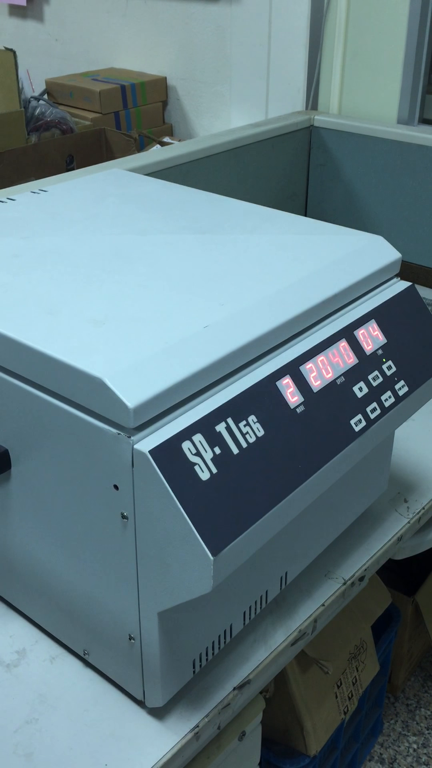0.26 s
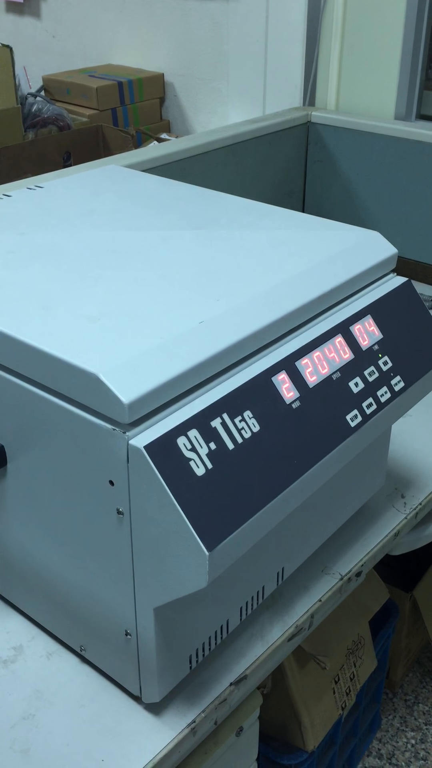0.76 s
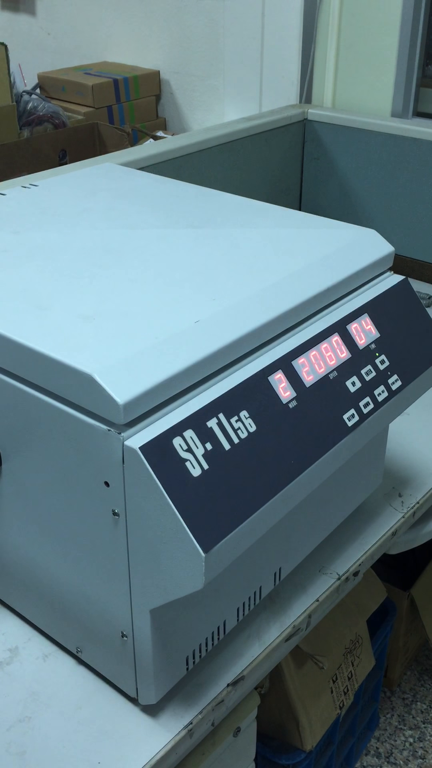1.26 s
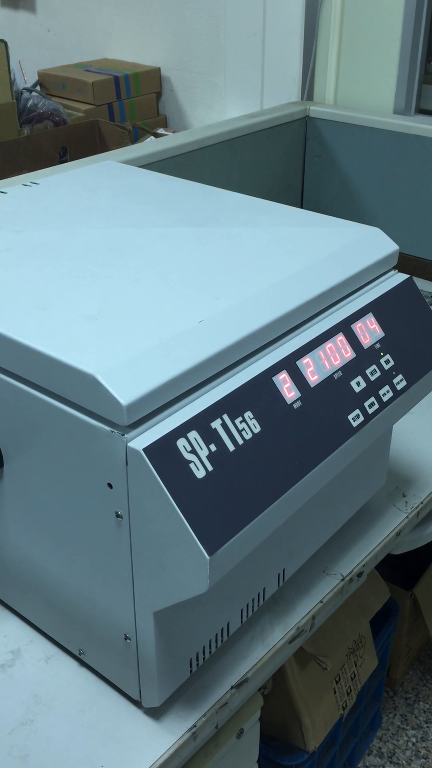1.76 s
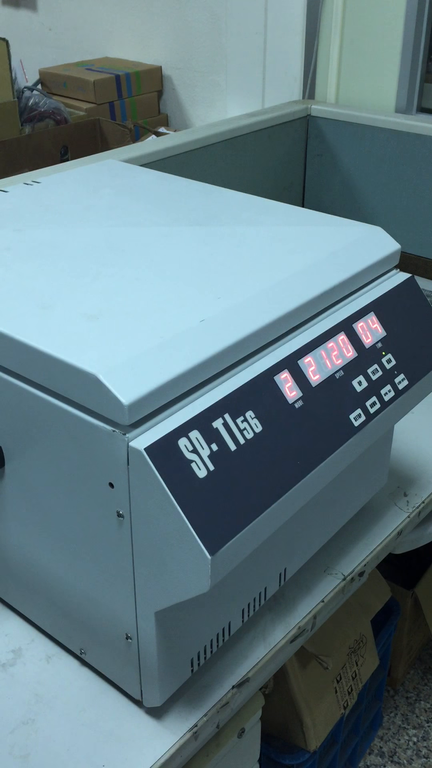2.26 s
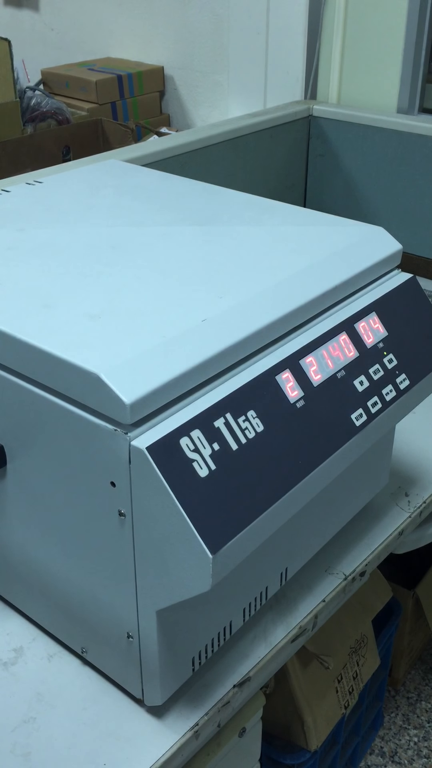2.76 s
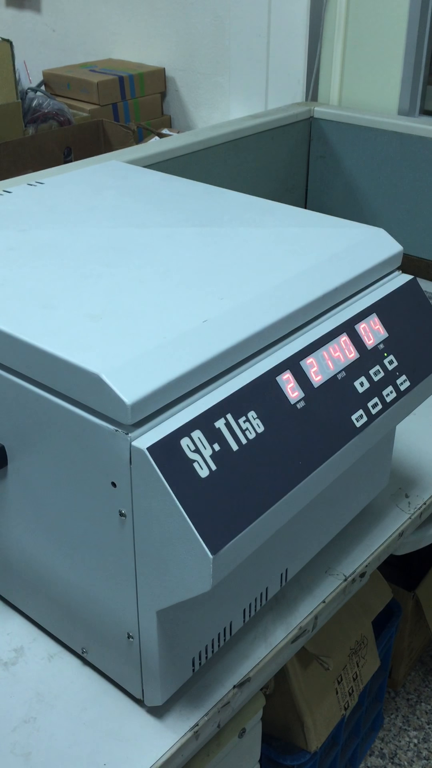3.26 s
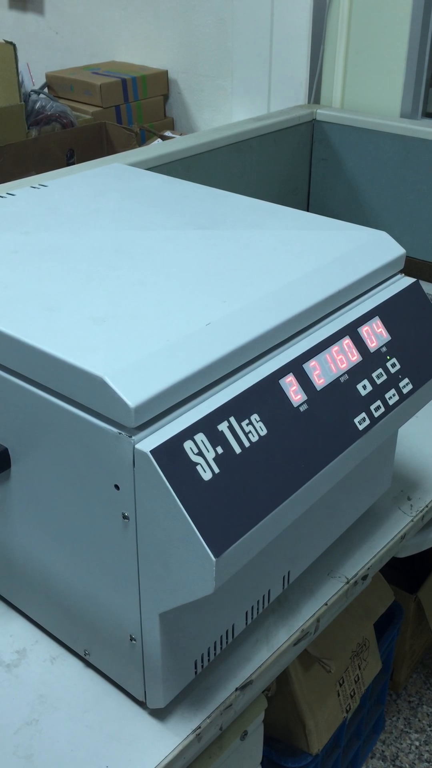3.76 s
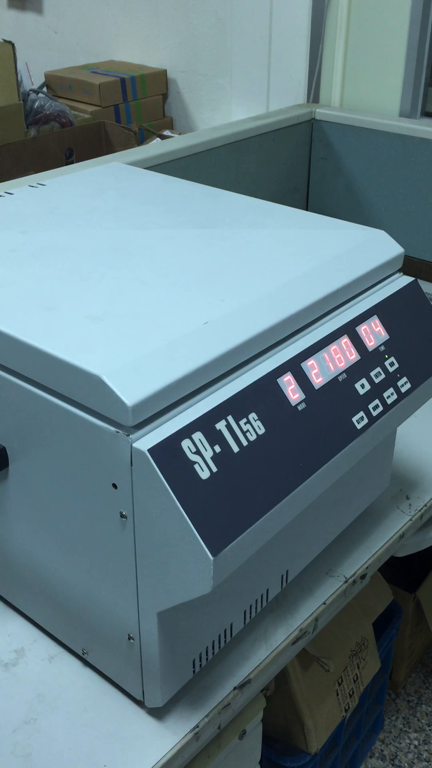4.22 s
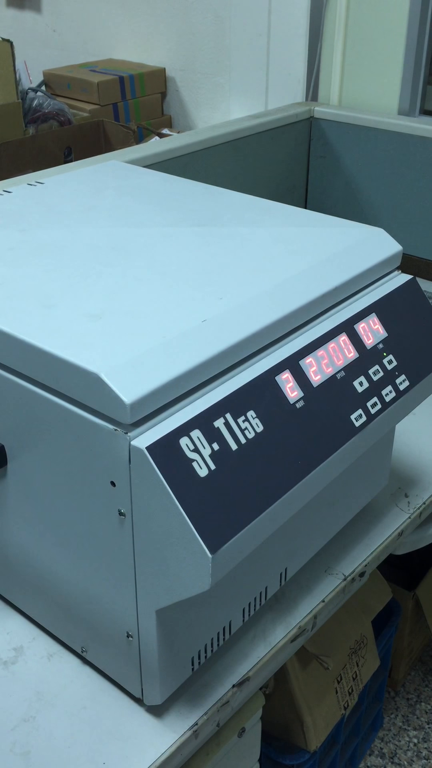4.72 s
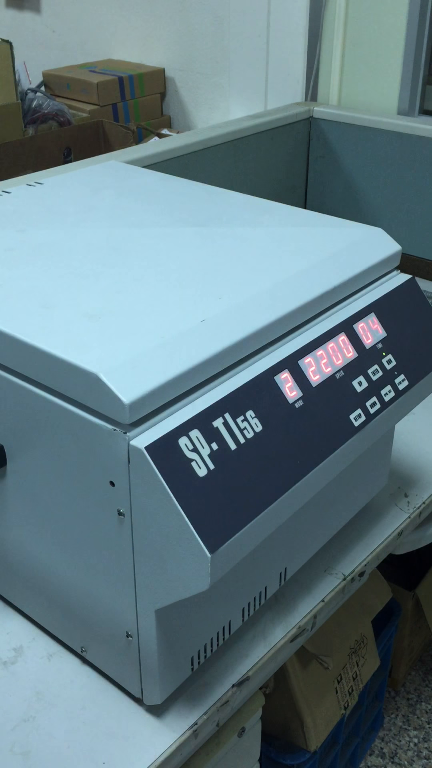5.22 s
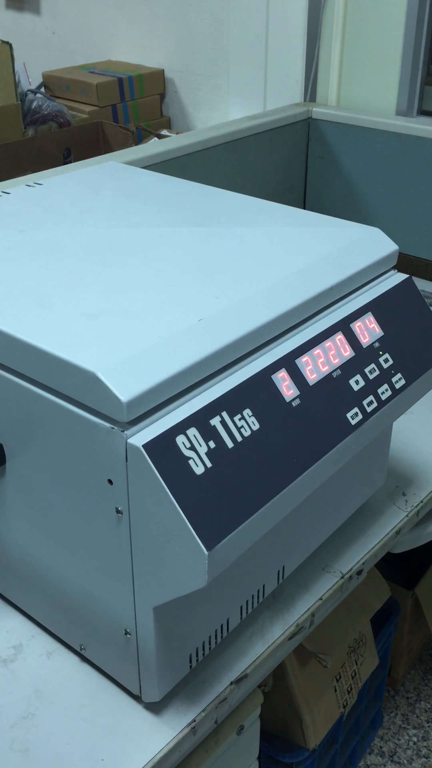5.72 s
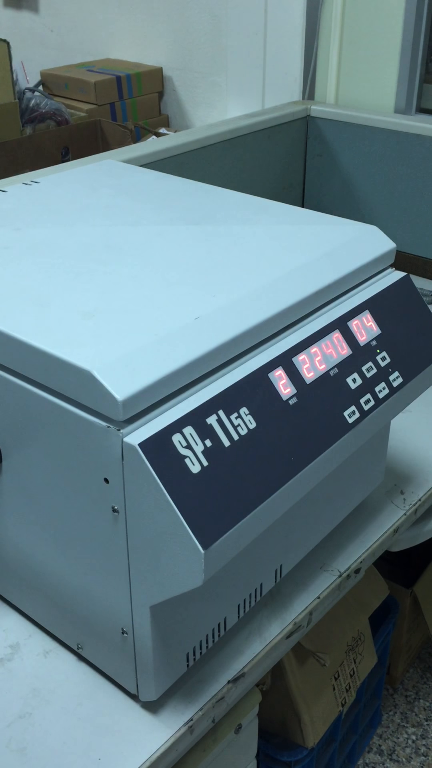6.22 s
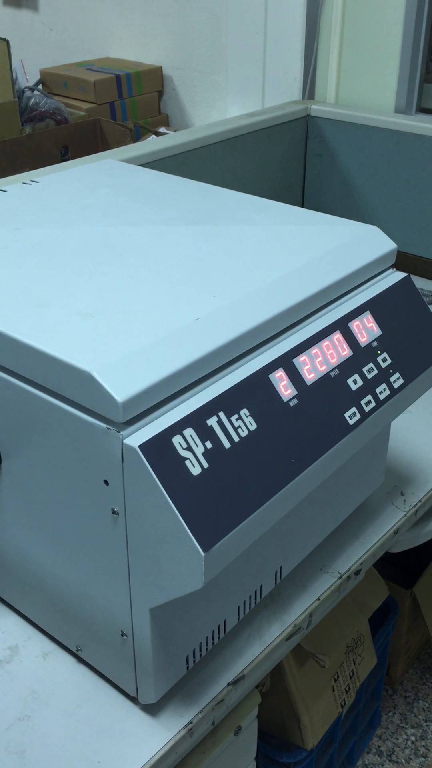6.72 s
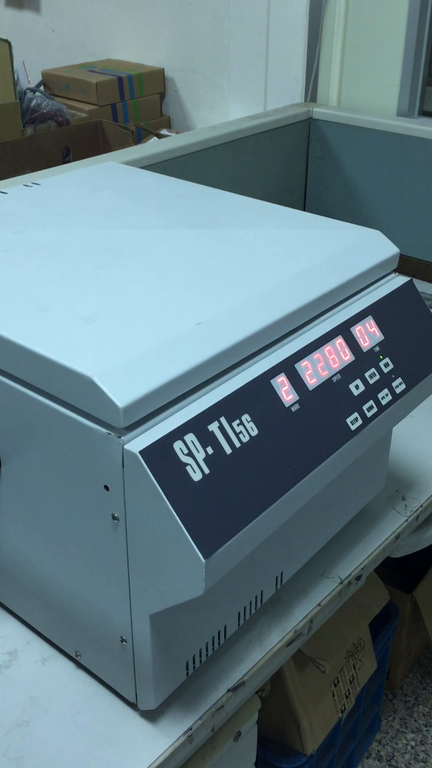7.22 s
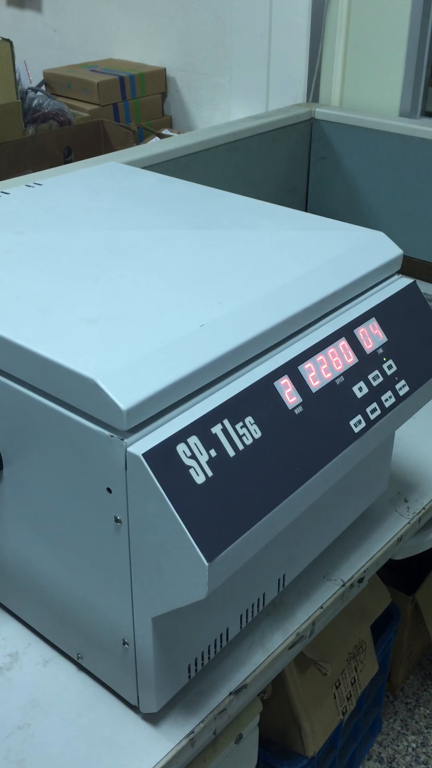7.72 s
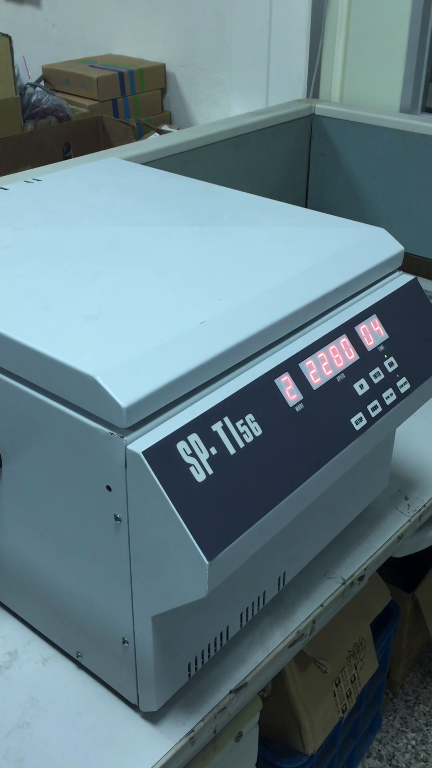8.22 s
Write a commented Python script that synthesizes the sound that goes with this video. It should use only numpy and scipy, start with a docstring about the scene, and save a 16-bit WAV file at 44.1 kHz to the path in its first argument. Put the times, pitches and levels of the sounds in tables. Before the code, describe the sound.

A benchtop centrifuge gathers speed close by, its low smooth hum creeping up in pitch under a steady, slowly swelling rush of churned air.

```python
"""A small hard room: a benchtop centrifuge gathers speed close to the microphone.
Four buckets sweep the bowl, so a clean sine sounds at four times the shaft speed, with a weak octave.
The air they churn is noise that swells with speed and roars through the resonances of bowl, case and room.
A faint rustle in the case is one short burst of band-passed noise; steady sines hum underneath."""
import sys
import numpy as np
from scipy import signal
from scipy.fft import rfft, irfft
from scipy.io import wavfile
from scipy.ndimage import uniform_filter1d

SR = 44100
rng = np.random.default_rng(int(sys.argv[2]) if len(sys.argv) > 2 else 0)


def file_out(sig):
    """Save sig as 16-bit WAV at sys.argv[1]."""
    # one column per channel
    cols = np.atleast_2d(sig).T
    # limit, then scale
    lim = np.clip(cols, -1, 1)
    pcm = np.round(lim * 32767).astype(np.int16)
    wavfile.write(sys.argv[1], SR, pcm)


N = 373968

START_HZ, GAIN_HZ_PER_S = 137.4, 2.0  # bucket passes a second, rising evenly


def gain_of(db):
    """Decibels to an amplitude factor."""
    return 10 ** (np.asarray(db) / 20)


def evened(x):
    """Scales a signal to rms 1."""
    return x / np.sqrt(np.mean(x ** 2) + 1e-20)


def read(points, hz):
    """Interpolates a curve of (frequency, value) points on a log-frequency axis."""
    point_hz, value = np.transpose(points)
    return np.interp(np.log(hz + 1), np.log(point_hz + 1), value)


def resonance_db(modes, hz):
    """Sums flat-topped lifts and dips; each falls to half its decibels at the edges of its width."""
    return sum(db / (1 + (2 * (hz - centre) / width) ** 4) for centre, width, db in modes)


def drift(t, top_hz):
    """Slow random wander of rms 1: sines of random phase, the slower ones stronger."""
    rates_hz = top_hz * np.geomspace(.1, 1, 20)
    return evened(sum(np.sin(2 * np.pi * (f * t + rng.random())) / np.sqrt(f) for f in rates_hz))


def buckets():
    """The pressure wave of the passing buckets and its octave, gliding up and wavering a little."""
    tone_db, octave_db = -27.0, -43.6  # rms levels ahead of the room and the wavering
    t = np.arange(N) / SR
    hz = START_HZ + GAIN_HZ_PER_S * t
    phase = 2 * np.pi * (START_HZ * t + GAIN_HZ_PER_S * t ** 2 / 2)  # integral of the rising pitch

    tone_level_db = tone_db + standing_db(hz) + 0.35 * drift(t, top_hz=8.0)
    tone = gain_of(tone_level_db) * np.sin(phase)

    octave_level_db = octave_db + standing_db(2 * hz) + 1.4 * drift(t, top_hz=6.0)
    octave = gain_of(octave_level_db) * np.sin(2 * phase + 2 * np.pi * rng.random())
    return np.sqrt(2) * (tone + octave)  # a sine of rms 1 peaks at root two


def standing_db(hz):
    """Lift or loss that the standing waves of the room give a tone at hz."""
    # standing waves that the tone and octave climb through: (centre [Hz], width [Hz], lift [dB])
    standing_waves = [(138.7, 1.0, 1.0), (143.6, 4.1, -1.8), (151.6, 8.3, 3.1), (273.7, 7.4, -10),
                      (292.3, 5.3, -11), (301.4, 2.1, -11), (304.4, 2.5, -5)]
    return resonance_db(standing_waves, hz)


def air():
    """Turbulent noise that swells with speed, in soft patches, then rings the fixed resonances."""
    return colour_air(churn_air())


def churn_air():
    """White noise shaped in time and frequency: faster buckets churn the air harder."""
    # how much louder the air gets for a tenth more speed: (frequency [Hz], growth [dB])
    growth = [(60, 1), (200, 2), (700, 1), (2000, 1.5), (6000, 2.5), (14000, 3.5)]
    window, hop = 512, 128  # samples
    frames, hz = N // hop + 5, np.fft.rfftfreq(window, 1 / SR)
    t = np.arange(frames) * hop / SR
    real, imag, patches = rng.standard_normal((frames, len(hz), 3)).T

    # blur over 8 frequency bins and 30 frames
    patches = uniform_filter1d(patches, size=8, axis=0)
    patches = evened(uniform_filter1d(patches, size=30, axis=1))

    tenths = 10 * GAIN_HZ_PER_S * (t - t.mean()) / START_HZ  # speed about its middle, in tenths of the start
    tenths -= .8 * tenths ** 2  # the swell levels off at the higher speeds
    swell_db = read(growth, hz)[:, None] * tenths
    field_db = swell_db + 0.77 * patches + 0.23 * drift(t, top_hz=16.0)

    spectrum = (real + 1j * imag) * gain_of(field_db)
    churn = signal.istft(spectrum, nperseg=window, noverlap=window - hop)[1]
    return evened(churn[:N])


def colour_air(churn):
    """Filters the churned air through its broad colour, the resonances and a fine random ripple."""
    # broad colour of the churned air: (frequency [Hz], density [dB per Hz])
    air_colour = [(35, -90), (48, -75.5), (97, -72.5), (118, -64), (200, -61), (340, -68), (560, -74.5),
                  (2300, -74.5), (4100, -78.5), (5200, -84.5), (7000, -89.5), (9100, -92.5), (10300, -100),
                  (12000, -99), (15500, -103)]
    # resonances and hollows of bowl, case and room: (centre [Hz], width [Hz], lift [dB])
    case_modes = [(70, 6, -1), (126, 19, 6), (150, 10, 5.5), (211.6, 12, 4.5), (229, 16, -4.5),
                  (248, 8.2, 1), (263.5, 9.5, 4), (324, 16.5, 5), (340, 10, -1), (416, 12.3, 6.5),
                  (436.5, 14, 4), (460, 7, -3.5), (465, 10, 4), (496.6, 13, 4), (518, 17, 2), (619, 23, 3),
                  (705, 34, 4), (980, 30, 3.5), (1295, 75, 2), (1336, 36, -2), (1705, 49, 3),
                  (2050, 100, 3.5), (2325, 79, 2.5), (2785, 150, -2), (3146, 140, 3.5), (3580, 200, -2.5),
                  (4330, 180, 1), (4860, 220, -3), (5700, 970, 1.5), (10300, 250, 0)]
    hz = np.fft.rfftfreq(N, 1 / SR)
    lift_db = resonance_db(case_modes, hz)

    # crowded upper modes of the room roughen the colour
    ripple = uniform_filter1d(rng.standard_normal(len(hz)), size=110)
    ripple = evened(uniform_filter1d(ripple, size=110))
    lift_db += 1.2 * ripple * hz / (hz + 400) / (1 + hz / 20000)

    coloured = rfft(churn) * gain_of(read(air_colour, hz) + lift_db)
    return irfft(coloured, N) * np.sqrt(SR / 2)  # from rms 1 to density 1 per Hz


def rustle():
    """A soft burst of noise around a centre frequency, with a quick rise and an exponential decay."""
    # faint rustle in the case: (time [s], rms level ahead of rise and decay [dB], centre [Hz], t60 [s])
    rustles = [(2.395, -35.5, 2000, .15)]
    length = 4000  # samples
    out, t = np.zeros(N), np.arange(length) / SR
    rise = 1 - np.exp(-t / .002)
    for start, db, hz, t60 in rustles:
        band = signal.butter(2, [hz * .65, hz * 1.35], "bandpass", fs=SR)
        noise = evened(signal.lfilter(*band, rng.standard_normal(length)))
        decay = gain_of(db - 60 * t / t60)
        out[round(start * SR):][:length] += noise * rise * decay
    return out


def hum():
    """Sines of fixed pitch and level, each from a random phase."""
    # steady hum of the supply and of other machines: (frequency [Hz], rms level [dB])
    hum_tones = [(45.3, -67.5), (58.8, -62.5), (103.6, -58.5), (120, -44.5)]
    t = np.arange(N) / SR
    return sum(np.sqrt(2) * gain_of(db) * np.sin(2 * np.pi * (hz * t + rng.random()))
               for hz, db in hum_tones)


def scene():
    """All sources summed at the one microphone."""
    return (buckets() + air() + rustle() + hum())[None]


def record(dry):
    """Limits the band with a steep linear-phase low-pass."""
    edge_hz = 15230
    low_pass = signal.firwin(1023, edge_hz, window=("kaiser", 9), fs=SR)
    return signal.oaconvolve(dry, low_pass[None], "same")


dry = scene()
out = record(dry)
file_out(out)
```